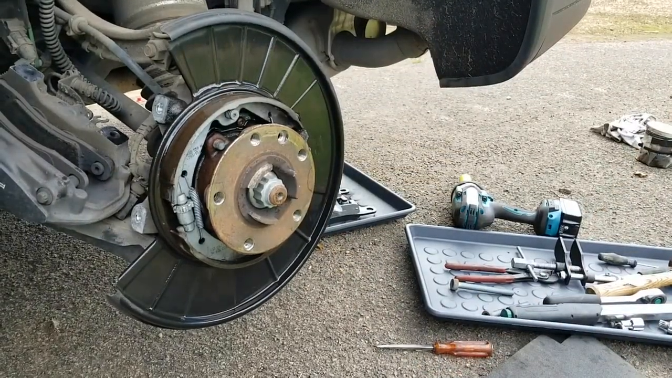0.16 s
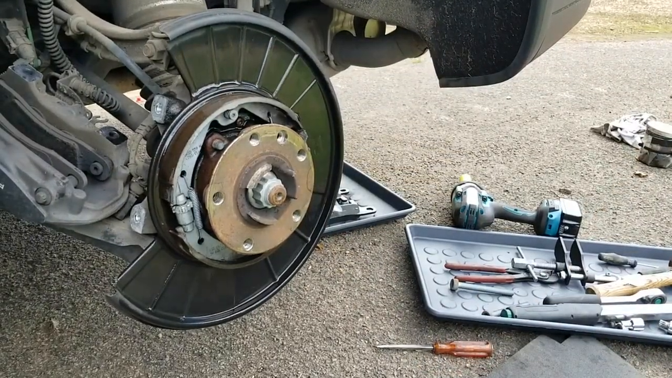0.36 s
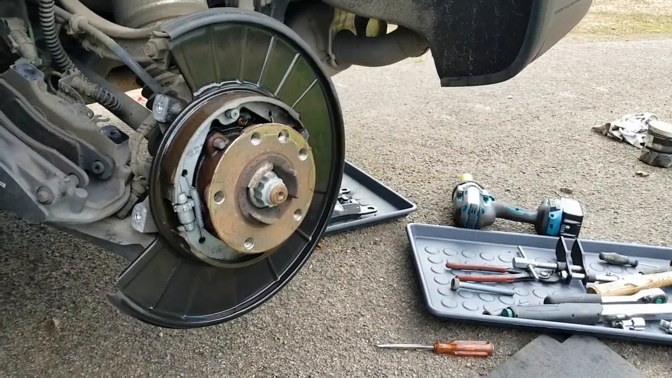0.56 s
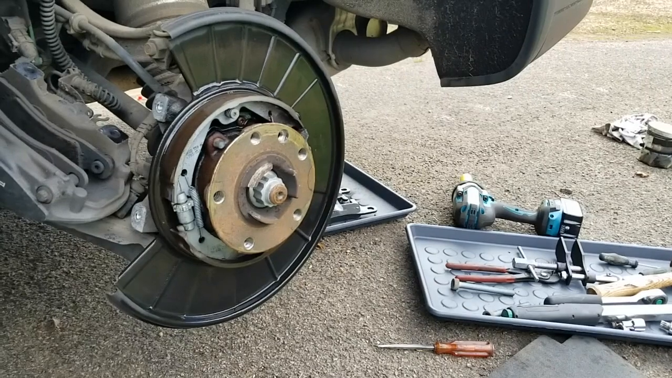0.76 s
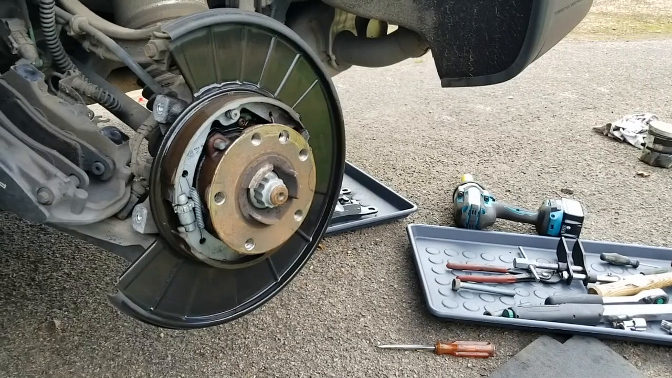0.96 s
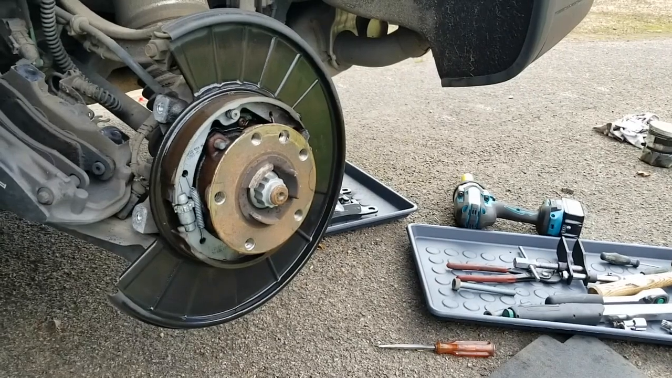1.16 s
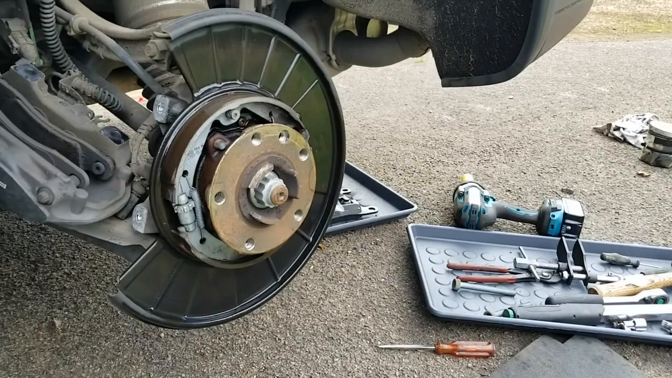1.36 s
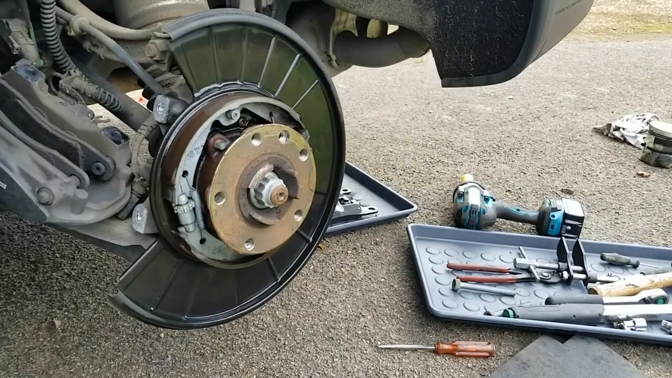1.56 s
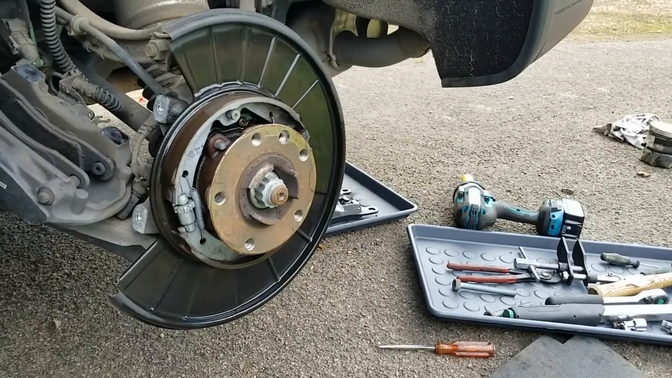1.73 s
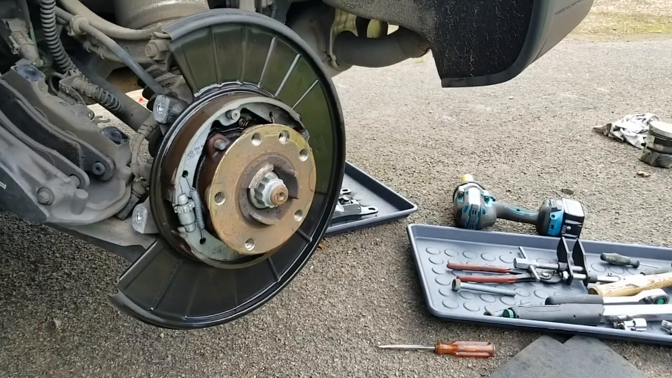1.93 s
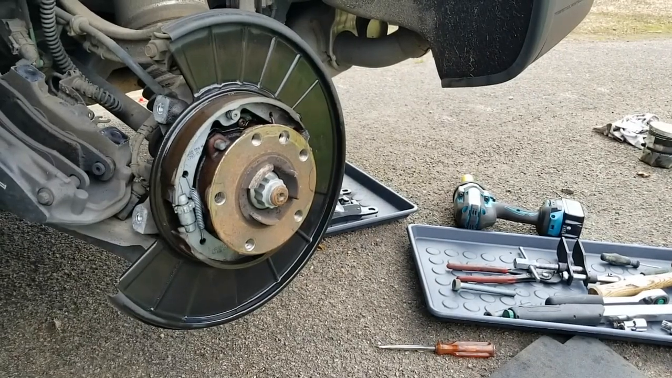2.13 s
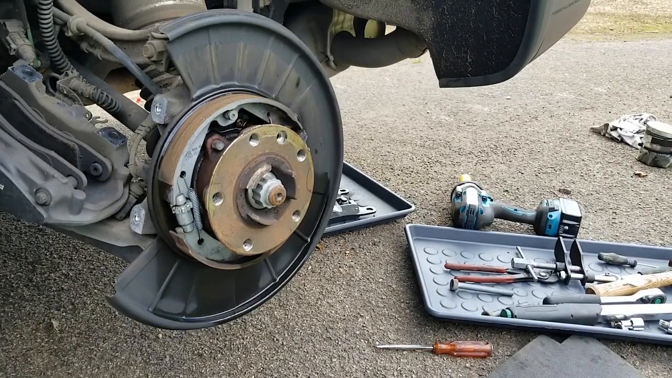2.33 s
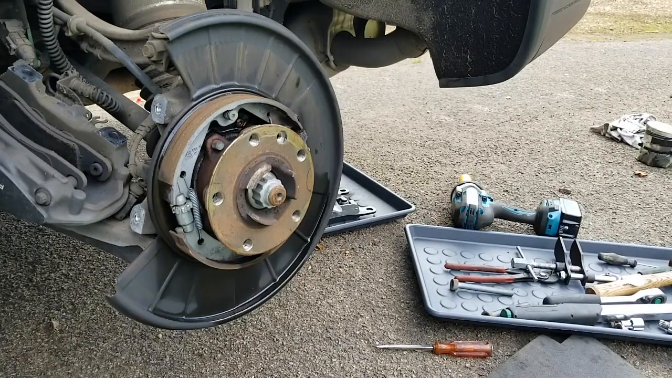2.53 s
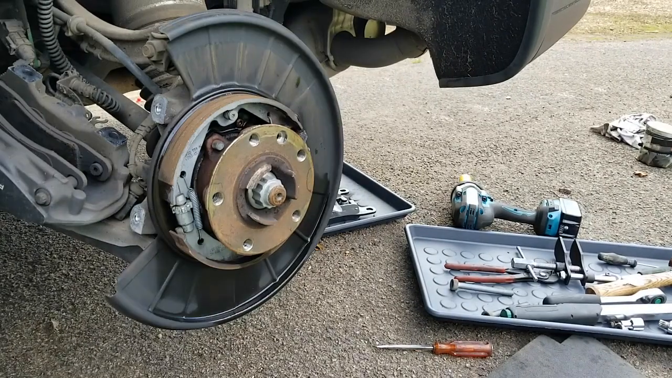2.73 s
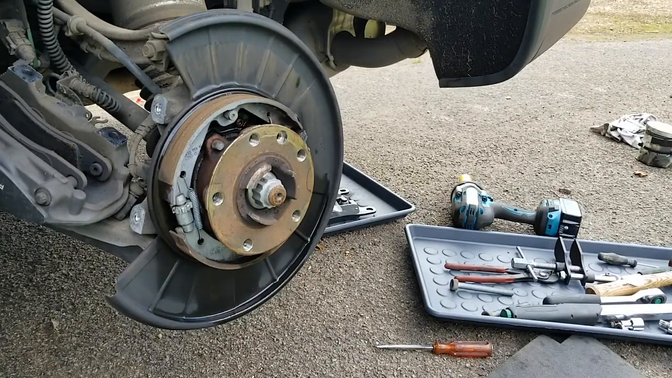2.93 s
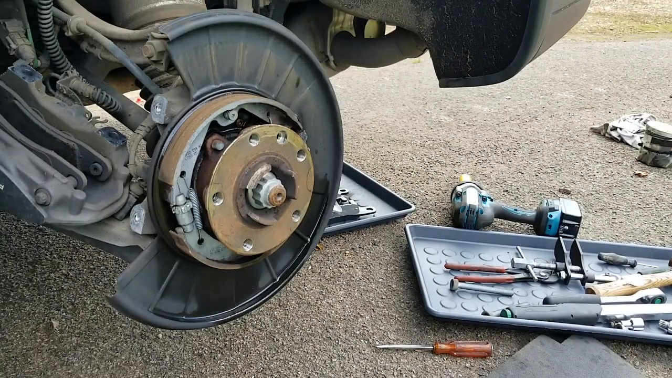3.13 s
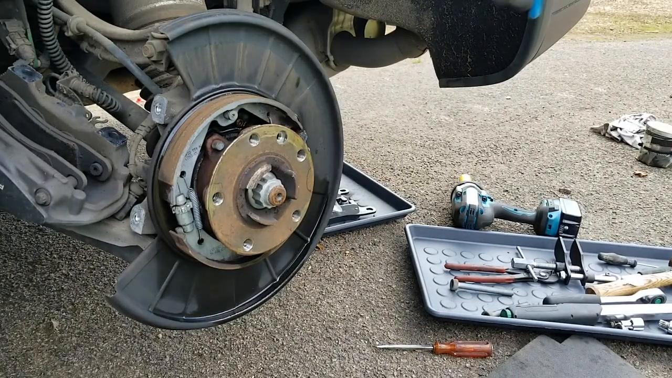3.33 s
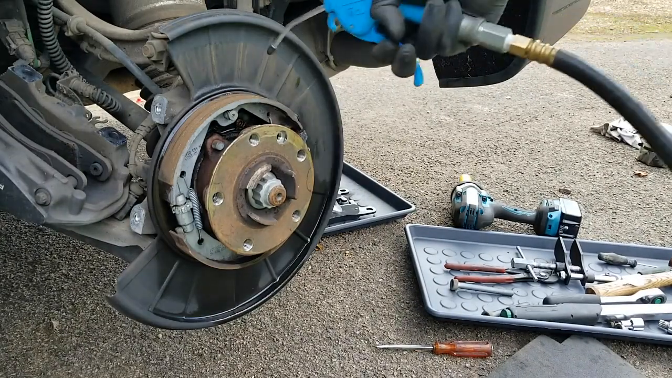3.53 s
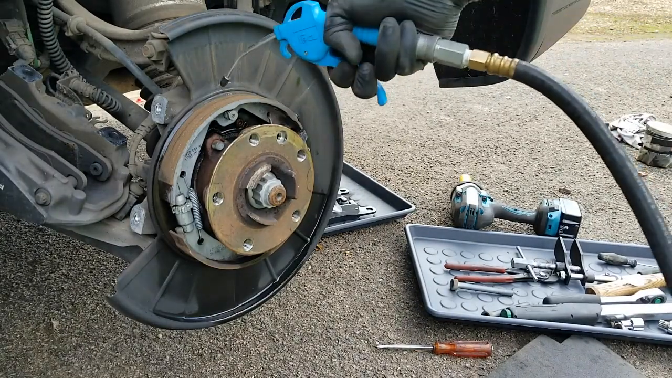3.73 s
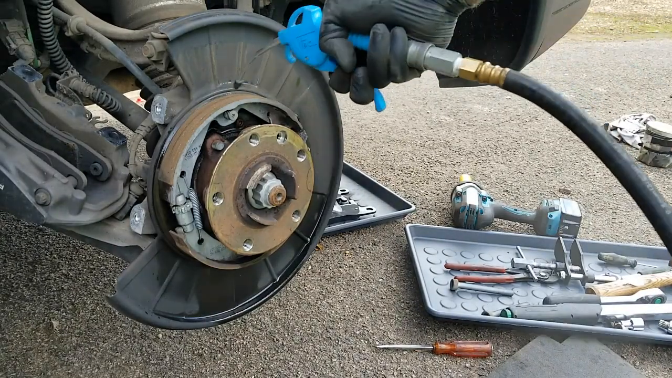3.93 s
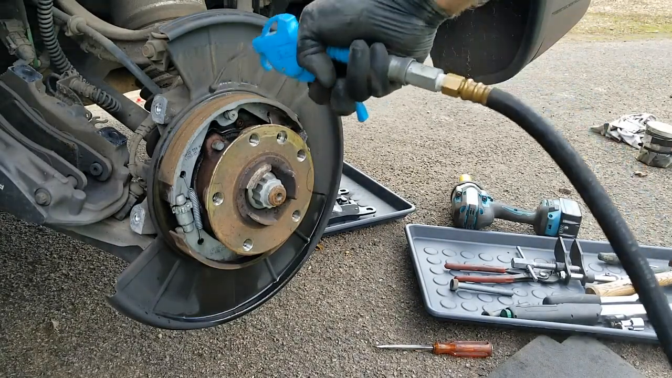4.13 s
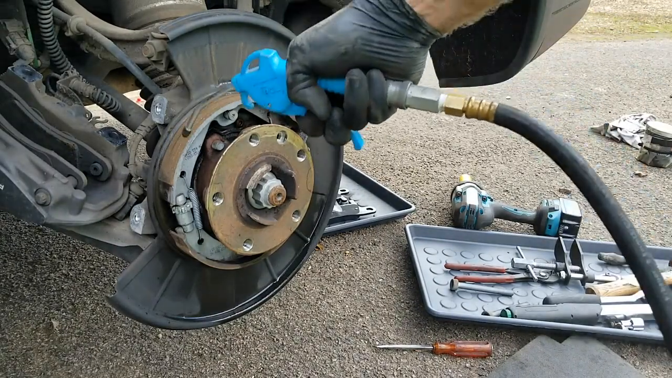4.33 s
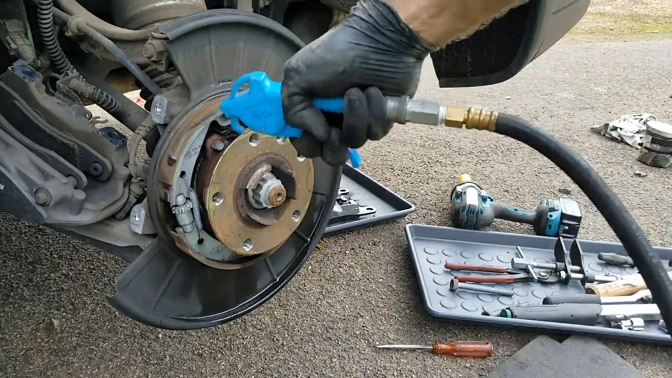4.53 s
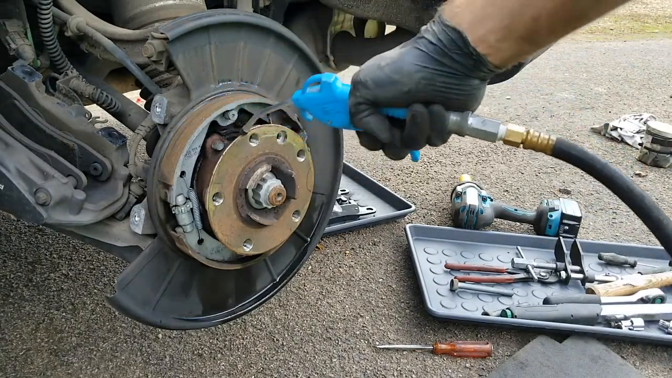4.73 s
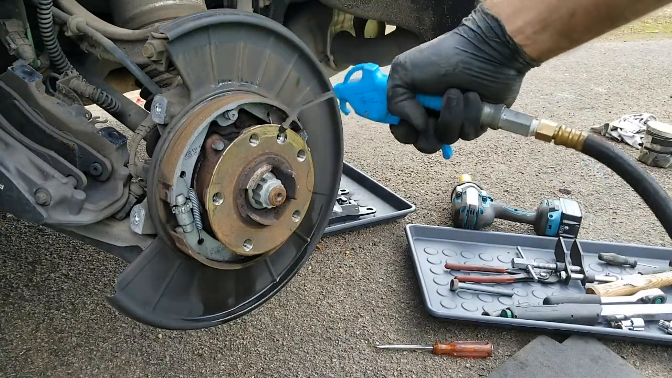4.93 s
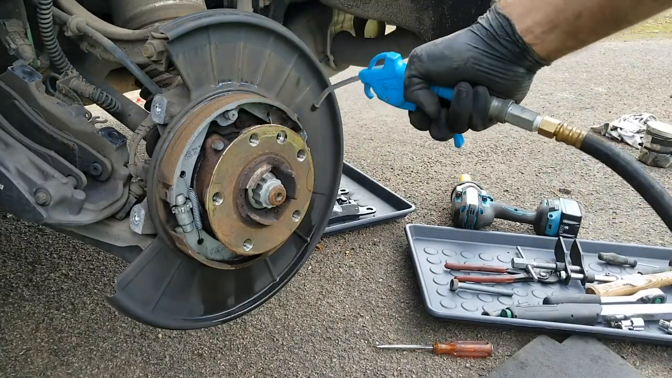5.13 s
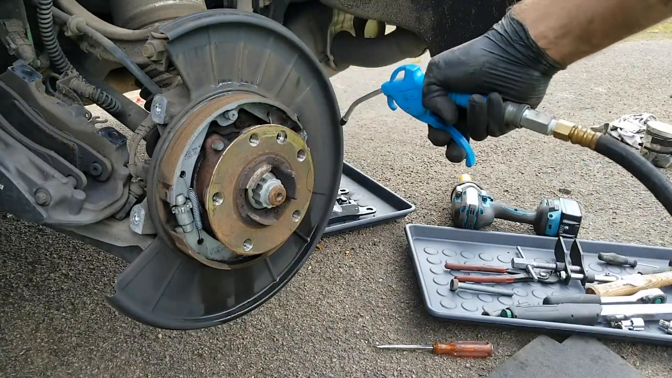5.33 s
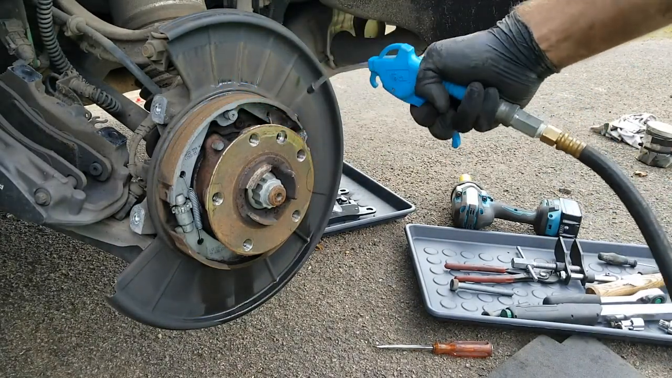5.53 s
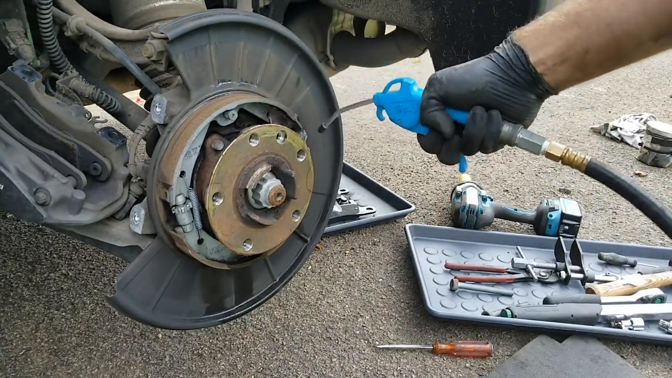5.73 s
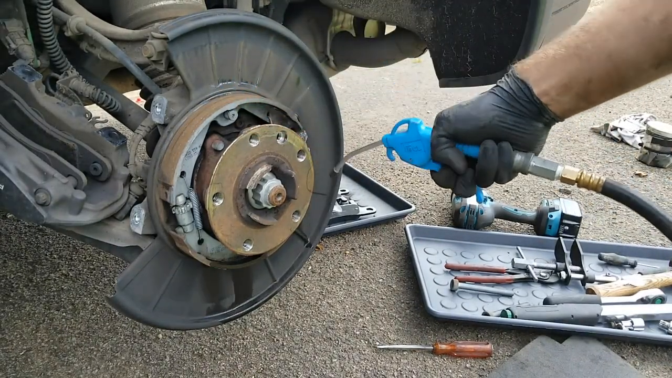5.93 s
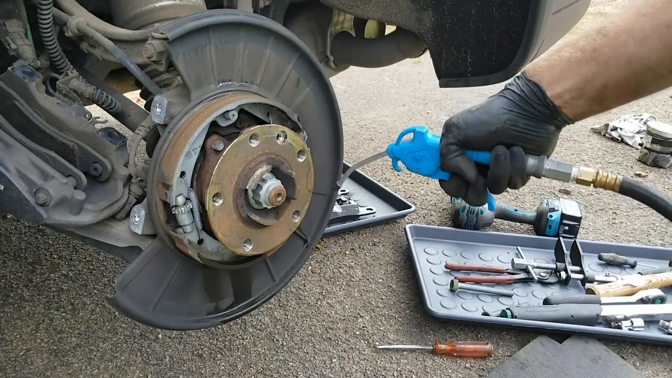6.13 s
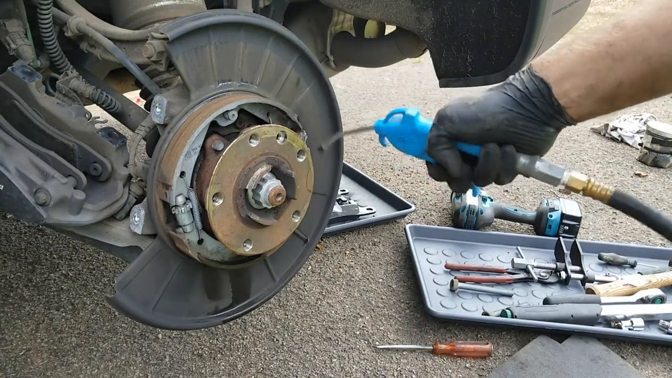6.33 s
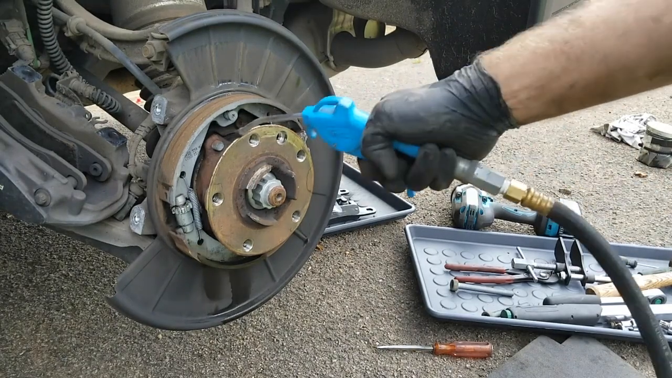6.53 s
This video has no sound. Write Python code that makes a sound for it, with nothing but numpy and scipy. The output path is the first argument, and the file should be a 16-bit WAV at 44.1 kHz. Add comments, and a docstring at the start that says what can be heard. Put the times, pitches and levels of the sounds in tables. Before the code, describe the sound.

Very quiet outdoor air with soft rustles and tiny knocks, then a faint thin squeak and a low motor hum that swells. A few sharper clicks lead into a sudden loud air-gun blast lasting over a second, hissing and roaring on metal. Two half-second blasts follow, then three rapid jabs, each cutting off sharply. Close stereo microphone, leaning right, with a slight short echo.

```python
"""On the drive outside a garage, a blow gun blasts air over a car's rear drum brake.
At first there is only quiet outdoor air with rustling, small knocks and a faint squeak; then a motor hums
and the gun is fired six times. Air, rustles, puffs and jet are shaped noise; the motor is a stack of sine
tones over noise. The jet hisses, roars and rushes on the metal, howls in hollows and rings the plate."""
import sys
import numpy as np
from scipy import signal
from scipy.fft import rfft, irfft
from scipy.io import wavfile
from scipy.ndimage import uniform_filter1d, map_coordinates

SR = 44100
rng = np.random.default_rng(int(sys.argv[2]) if len(sys.argv) > 2 else 0)


def unload_audio(sound):
    """Save the sound as a 16-bit wav file, at the path given as the first command line argument."""
    columns = np.transpose(np.atleast_2d(sound))
    # keep every value between -1 and 1, then stretch to whole-number steps
    steps = np.round(np.clip(columns, -1, 1) * 32767)
    wavfile.write(sys.argv[1], SR, steps.astype(np.int16))


N = 294588
TIME = np.arange(N) / SR
BIN_HZ = np.arange(N // 2 + 1) * SR / N

# Spectrum tables give only the shape of a noise; noise() evens out the overall strength.
# Levels in all tables come before trims, wavering and panning.

# quiet outdoor air, spectrum: (f/Hz, level/dB)
AIR_SPECTRUM = [(15, -42), (25, -27), (43, 0), (106, 0), (186, -14.5), (271, -14), (394, -5.5), (515, -6.5),
                (1060, -11.5), (1910, -31.5), (3090, -26), (4380, -34.5), (5570, -35), (7890, -41),
                (15000, -34)]
AIR_DB = -59.5
# rustling strokes nearby: (middle t/s, half length t/s, scuff level/dB, fine hiss level/dB)
RUSTLES = [(0.166, .13, -59, -63), (0.407, .035, -62, -68), (0.548, 0.048, -64.5, -64.5),
           (0.7, 0.074, -66, -64.5), (1.146, 0.14, -64, -64), (1.388, 0.071, -66, -61.5),
           (2.654, 0.084, -53, -66), (2.85, 0.095, -60.5, -59), (3.08, .07, -62, -74),
           (3.301, 0.057, -58, -55.5), (3.41, 0.067, -52, -57.5)]
# scuffing sound of a rustle, spectrum: (f/Hz, level/dB)
SCUFF_SPECTRUM = [(500, 10), (1000, 8.5), (1600, 2.5), (2300, -3), (3200, 0), (4200, -15), (7000, -30),
                  (10000, -68)]
# fine hiss of the rustles and the motor, spectrum: (f/Hz, level/dB)
FINE_HISS_SPECTRUM = [(2000, -26), (4000, -2.5), (6500, -5), (9000, -10.5), (12500, 1.5), (15700, -2)]
# small knocks and scrapes of handling: (t/s, level/dB, decay t/s, ringing f/Hz)
KNOCKS = [(1.07, -53.5, 0.017, 900), (1.172, -54.5, .0055, 2110), (1.239, -59, .0062, 2000),
          (1.302, -56.5, .026, 1000), (1.322, -53, 0.048, 1000), (2.795, -44, 0.01, 1100),
          (2.915, -36.5, 0.0039, 1380), (3.385, -41, 0.0076, 696), (3.405, -38, .006, 900),
          (3.418, -31, 0.0035, 1500)]
# dull thud of a knock, spectrum: (f/Hz, level/dB)
THUD_SPECTRUM = [(150, -8), (600, 8.5), (950, 6.5), (1500, -3.5), (2500, -4.5), (4500, -23), (14000, -42)]
KNOCK_ATTACK_S, KNOCK_WIDTH_HZ = .002, 700
KNOCK_RING_DB, KNOCK_THUD_DB = -1.5, -1.5
# a faint high squeak: (t/s, f/Hz, level/dB)
SQUEAK = [(2.11, 5900, -95), (2.17, 5750, -77), (2.28, 5530, -79), (2.34, 5500, -86)]
# motor speed: (t/s, turns per second f/Hz)
MOTOR_SPEED = [(2.38, 39), (2.70, 37.7), (2.88, 33.3), (2.99, 40), (3.30, 39.3), (3.5, 36.6), (6.68, 38)]
# motor tones at one, two and three times the speed: (level/dB), relative to the motor
MOTOR_ORDERS_DB = [-4.5, -3, -8]
# rumble of the motor, spectrum: (f/Hz, level/dB)
RUMBLE_SPECTRUM = [(25, -7), (70, -2), (150, -0.5), (260, -5), (500, -14), (900, -10), (1500, -16),
                   (3000, -24.5), (4200, -50)]
MOTOR_DB, MOTOR_SWELL_DB_PER_S = -46, 4.5
TURNED_DOWN_DB, TURN_DOWN_S = -62.5, 0.061
# and turned up a little towards the end
TURN_UP_FROM_S, TURN_UP_DB = 5.6, 5
DRONE_FROM_S, DRONE_RISE_S = 2.9, 0.061
DRONE_WEAK_DB, DRONE_STRONG_DB = -9, 0  # relative to the motor
# stray puffs of air on the microphone: (t/s, level/dB, half length t/s)
PUFFS = [(0.027, -56.5, 0.035), (1.081, -49.5, .012), (2.788, -36, 0.0098), (3.732, -45, 0.014),
         (4.027, -38, 0.0098), (4.752, -43.5, 0.0092), (4.956, -43.5, 0.011), (5.132, -45, 0.0081),
         (5.412, -39.5, 0.016), (6.491, -37, 0.012)]
LULL_FROM_S, LULL_TO_S = 2.342, 2.381  # the background nearly falls silent for a moment

# blasts of the gun: (trigger opens t/s, closes t/s, starting hiss level/dB, hiss sag in dB per s,
# roar level/dB and rush level/dB relative to the impact)
BLASTS = [(3.450, 4.574, -14.5, 3.5, -6.5, -2), (4.689, 5.211, -16, 1.75, -5, 0),
          (5.391, 5.978, -19, 4.2, -4, -1.8), (6.046, 6.155, -20, 23, -6, -3.5),
          (6.25, 6.352, -16, 22, -3.5, -4), (6.46, 6.772, -14.5, 22, -7, -3.5)]
# how hard the jet strikes as the nozzle is swept round the hub, a list per blast: (t/s, impact level/dB)
SWEEPS = [
    [(3.465, -22.5), (3.495, -20), (3.673, -29.5), (3.703, -24.5), (3.723, -32), (3.909, -27.5),
     (3.925, -32), (3.999, -27.5), (4.039, -29), (4.285, -32.5), (4.329, -26.5), (4.57, -27)],
    [(4.7, -32.5), (4.75, -30.5), (4.786, -25), (4.802, -29), (4.874, -24.5), (4.924, -32.5), (4.978, -24),
     (4.992, -30), (5.052, -25), (5.064, -29), (5.148, -23), (5.21, -28)],
    [(5.4, -23.5), (5.444, -24.5), (5.468, -17), (5.522, -23.5), (5.554, -19.5), (5.604, -29), (5.644, -17),
     (5.744, -23), (5.804, -30.5), (5.86, -19), (5.9, -27), (5.975, -26)],
]
# the same while the nozzle is jabbed at the brake: (t/s, impact level/dB)
JABS = [
    [(6.055, -22), (6.083, -16.5), (6.143, -22), (6.155, -27)],
    [(6.26, -22), (6.288, -15), (6.342, -27.5), (6.352, -24.5)],
    [(6.47, -20), (6.486, -30), (6.562, -22.5), (6.675, -19)],
]
# brief dips of the hiss: (t/s, half length t/s, depth level/dB)
HISS_DIPS = [(3.965, 0.022, 4), (4.183, 0.039, 3.5), (4.376, .04, 0.5), (4.572, 0.058, 7.5),
             (4.703, .04, 7.5), (4.915, 0.031, 4), (5.075, 0.021, 7.5), (5.171, 0.035, 6.5),
             (5.77, .04, 5.5)]
HISS_WANDER_DB, HISS_WANDER_HZ = 0.78, 8
ROAR_GROWTH, FULL_IMPACT_DB = 0.92, -23  # dB of roar per dB of impact, about this level
COLOUR_WANDER_DB, COLOUR_WANDER_HZ = 0.55, 10.6  # as the angle changes, rush and roar trade places
# hiss of the free jet, spectrum: (f/Hz, level/dB)
HISS_SPECTRUM = [(2000, -88), (6000, -11), (8500, -12.5), (10000, -7.5), (11500, -0.5), (13000, 1),
                 (15700, 1.5)]
# roar where the jet strikes the metal, spectrum: (f/Hz, level/dB)
ROAR_SPECTRUM = [(60, -24), (200, -21), (430, -16.5), (750, -8.5), (1050, -5.5), (1400, 0.5), (1700, -1.5),
                 (2200, 1), (3050, 2), (3700, -8), (6000, -17), (12000, -35)]
# brighter rush of the striking jet, spectrum: (f/Hz, level/dB)
RUSH_SPECTRUM = [(900, -20.5), (2300, -4), (3000, 3.5), (3800, 0.5), (5000, 3), (6500, -0.5), (7600, -3),
                 (8700, -19.5), (13000, -12.5)]
# low turbulence of the spreading jet, spectrum: (f/Hz, level/dB)
BODY_SPECTRUM = [(100, -10.5), (300, -0.5), (450, -2.5), (800, -6.5), (1600, -17)]
BODY_DB = -48.5
BODY_FOLLOWS = 0.32  # share of the roar's swing that the low turbulence follows
# hollows of the brake that the jet blows across: (from t/s, to t/s, f/Hz, width f/Hz, level/dB)
HOLLOWS = [(3.407, 3.57, 1358, 130, -28.5), (5.434, 5.59, 2300, 266, -31), (5.601, 5.738, 1660, 200, -39),
           (6.023, 6.128, 2100, 450, -23), (6.228, 6.322, 1407, 380, -25), (6.51, 6.65, 2815, 222, -17),
           (6.61, 6.722, 2269, 259, -27.5)]
# ringing of the backing plate and hub: (f/Hz, level/dB, time to fall by 60 dB t/s)
PLATE = [(1510, -6, 1), (2230, -11, 0.12), (2977, -6, 0.11), (3960, 0, 0.09), (5330, -2, 0.093)]

PORT_GAP_S = 0.00055  # time that sound takes from one microphone port to the other
TAIL_T60_S, TAIL_DB = 0.37, -21.5  # echo: time to fall by 60 dB, and strength
CUTOFF_HZ = 15800


def from_db(db):
    """Turn decibels into a plain gain."""
    return 10 ** (np.asarray(db) / 20)


def rms_one(x):
    """Scale to an average strength (rms) of 1."""
    return x / np.sqrt(np.mean(x ** 2) + 1e-20)


def in_time(rows):
    """Columns of a curve table, sample by sample."""
    s, *columns = np.transpose(rows)
    return [np.interp(TIME, s, c) for c in columns]


def ramp(start, length):
    """Rise from 0 to 1 in a straight line."""
    return np.clip((TIME - start) / length, 0, 1)


def drift(rate):
    """Chance wavering with a spread of 1; a higher rate in Hz wavers faster."""
    return rms_one(irfft(rfft(rng.standard_normal(N)) / (1 + (BIN_HZ / rate) ** 2) ** 2, N))


def noise(spectrum, share=1):
    """Turbulence with a given spectrum; rms 1, of which a share of the power may be taken at each frequency."""
    hz, db = np.transpose(spectrum)
    log_hz = np.log(BIN_HZ + 1)
    # the bass falls away below the first table row
    below = np.maximum(np.log(hz[0]) - log_hz, 0)
    gain = from_db(np.interp(log_hz, np.log(hz), db) - 20 * below)
    return irfft(rfft(rng.standard_normal(N)) * rms_one(gain) * np.sqrt(share), N)


def wide_noise(spectrum, bass_likeness):
    """Noise from all around: alike at the two ports only where the waves are longer than their gap."""
    alike = np.clip(bass_likeness, 0, .99) * np.sinc(2 * BIN_HZ * PORT_GAP_S)
    shared = noise(spectrum)
    opposed = noise(spectrum, (1 - alike) / (1 + alike))
    return shared + opposed * np.array([[1], [-1]])


def resonate(x, hz, width_hz):
    """One resonance, gain 1 on top."""
    r = np.exp(-np.pi * width_hz / SR)
    feed = np.array([1, 0, -1]) * (1 - r * r) / 2
    return signal.lfilter(feed, [1, -2 * r * np.cos(2 * np.pi * hz / SR), r * r], x)


def pan(x, left_db):
    """Make the left louder than the right by left_db; a negative value favours the right."""
    return x * from_db(np.array([[left_db], [-left_db]]) / 2)


def delayed(x, seconds):
    """The same sound later, by a fixed or changing time."""
    return map_coordinates(x, [(TIME - seconds) * SR], order=2)


def outdoors():
    """Quiet outdoor air: steady noise from all around."""
    return from_db(AIR_DB) * wide_noise(AIR_SPECTRUM, bass_likeness=0.77)


def rustling():
    """Each stroke swells and fades smoothly, a scuff with a fine hiss on top."""
    scuff, fine = 0, 0
    for middle, length, scuff_db, fine_db in RUSTLES:
        stroke = 1 / np.sqrt(1 + ((TIME - middle) / length) ** 4)
        scuff = np.maximum(scuff, from_db(scuff_db) * stroke)
        fine = np.maximum(fine, from_db(fine_db) * stroke)
    grain = from_db(1.4 * drift(80))  # rubbing surfaces catch and slip
    scuff_sound = scuff * wide_noise(SCUFF_SPECTRUM, bass_likeness=0.98)
    fine_sound = fine * wide_noise(FINE_HISS_SPECTRUM, bass_likeness=.5)
    return grain * (scuff_sound + fine_sound)


def knocks():
    """Tools and hose are moved: each knock is a dull thud with a brief ring of its own pitch."""
    thud = wide_noise(THUD_SPECTRUM, bass_likeness=.8)
    white = rng.standard_normal(N)
    out = 0
    for s, db, decay, hz in KNOCKS:
        attack = ramp(s - KNOCK_ATTACK_S / 2, KNOCK_ATTACK_S)
        blow = from_db(db) * attack * np.exp(-np.abs(TIME - s) / decay)
        ring = rms_one(resonate(resonate(white, hz, KNOCK_WIDTH_HZ), hz, KNOCK_WIDTH_HZ))
        out = out + blow * (from_db(KNOCK_THUD_DB) * thud + from_db(KNOCK_RING_DB) * ring)
    return out


def squeak():
    """A thin, unsteady tone that sinks a little."""
    hz, db = in_time(SQUEAK)
    sounding = (TIME > SQUEAK[0][0]) & (TIME < SQUEAK[-1][0])
    angle = 2 * np.pi * np.cumsum(hz * (1 + .035 * drift(400))) / SR
    return sounding * from_db(db) * np.sin(angle)


def motor():
    """A running motor: tones at multiples of its speed over rumble and faint hiss, turned down under the blasts."""
    speed, = in_time(MOTOR_SPEED)
    turned_down = ramp(BLASTS[0][0], TURN_DOWN_S)
    swelling_db = MOTOR_DB + MOTOR_SWELL_DB_PER_S * (TIME - LULL_TO_S)
    level_db = (1 - turned_down) * swelling_db + turned_down * TURNED_DOWN_DB
    level_db = level_db + TURN_UP_DB * ramp(TURN_UP_FROM_S, .5)
    # the fifth multiple drones, stronger between its rise and the blasts
    drone_on = ramp(DRONE_FROM_S, DRONE_RISE_S) * (1 - turned_down)
    drone_db = DRONE_WEAK_DB + (DRONE_STRONG_DB - DRONE_WEAK_DB) * drone_on
    angle = 2 * np.pi * np.cumsum(speed * (1 + 0.0076 * drift(12))) / SR
    tones = from_db(drone_db) * np.sin(5 * angle)
    for multiple, db in enumerate(MOTOR_ORDERS_DB, start=1):
        phase = 2 * np.pi * rng.random()
        tones = tones + from_db(db + 1.3 * drift(10)) * np.sin(multiple * angle + phase)
    rumble = from_db(-2.5) * pan(wide_noise(RUMBLE_SPECTRUM, bass_likeness=.75), -2.4)
    hiss = from_db(-22) * wide_noise(FINE_HISS_SPECTRUM, bass_likeness=.5)
    running = TIME > LULL_TO_S
    return running * from_db(level_db) * (np.sqrt(2) * tones + rumble + hiss)


def puffs():
    """Stray air buffets the ports with short low thumps."""
    strength = sum(from_db(db) * np.exp(-((TIME - s) / length) ** 2) for s, db, length in PUFFS)
    spectrum = [(40, 4), (80, 1.5), (190, 1.0), (400, -7), (1200, -42), (5000, -69)]  # (f/Hz, level/dB)
    return strength * wide_noise(spectrum, bass_likeness=0.35)


def wheel_arch(x, lag_s, bounce_db, sway, count=5):
    """Direct path, later at the right port, and short bounces off brake, body and ground that shift with the hand."""
    ports = np.array([x, delayed(x, lag_s)])
    for port in ports:
        for path_s in rng.uniform(.0006, .005, count):
            bounce = from_db(bounce_db) * rng.choice([-1, 1])
            port += bounce * delayed(x, path_s * (1 + sway * drift(2.542)))
    # the bounces change the colour, not the strength
    return ports / np.sqrt(uniform_filter1d(ports.mean(axis=0) ** 2, size=4000))


def garage(x, size=SR // 2):
    """Diffuse echo of the car and the garage front, different at each port."""
    t = np.arange(size) / SR
    fading = from_db(-60 * t / TAIL_T60_S) * (1 - np.exp(-t / 0.015))
    tails = rng.standard_normal((2, size)) * fading
    tails /= np.sqrt(np.sum(tails ** 2, axis=1, keepdims=True))
    return from_db(TAIL_DB) * signal.fftconvolve(x, tails, axes=1)[:, :N]


def valve(rise_s, fall_s):
    """Air flow: swells as the trigger is squeezed, dies as the lance empties."""
    flow = 0
    for opens, closes, *_ in BLASTS:
        squeeze = np.clip((TIME - opens) / rise_s + .5, 0, 1) ** 2
        flow = flow + squeeze * np.exp(-np.maximum(TIME - closes, 0) / fall_s)
    return flow


def jet_levels():
    """Hiss, roar and rush in dB: the hiss sags while the trigger is held; roar and rush follow the impact."""
    rows = []
    for opens, closes, hiss, sag, roar, rush in BLASTS:
        rows.append((opens, hiss, roar, rush))
        rows.append((closes, hiss - sag * (closes - opens), roar, rush))
    hiss_db, roar_db, rush_db = in_time(rows)
    dips_db = sum(depth * np.exp(-((TIME - s) / length) ** 2) for s, length, depth in HISS_DIPS)
    impact_db, = in_time(np.vstack([*SWEEPS, *JABS]))
    colour_db = COLOUR_WANDER_DB * drift(COLOUR_WANDER_HZ)
    return (hiss_db - dips_db + HISS_WANDER_DB * drift(HISS_WANDER_HZ),
            roar_db + FULL_IMPACT_DB + ROAR_GROWTH * (impact_db - FULL_IMPACT_DB) - colour_db,
            rush_db + impact_db + colour_db)


def hollows():
    """Each hollow howls while the jet sweeps across its mouth."""
    out = np.zeros(N)
    for start, end, hz, width_hz, db in HOLLOWS:
        sweep = np.sin(np.pi * ramp(start, end - start))
        # two passes through the same resonance sharpen the howl
        howl = resonate(resonate(rng.standard_normal(N), hz, width_hz), hz, width_hz)
        out += from_db(db) * sweep * rms_one(howl)
    return np.array([out, delayed(out, 0.000096)])


def blow_gun():
    """The free jet hisses; on the metal it flutters, roars and sets the plate ringing."""
    hiss_db, roar_db, rush_db = jet_levels()
    flutter = drift(23)
    hiss = wheel_arch(noise(HISS_SPECTRUM), lag_s=0.000121, bounce_db=0, sway=.14)
    hiss = hiss * from_db(hiss_db + 1.67 + 0.41 * flutter)
    roar = wheel_arch(noise(ROAR_SPECTRUM), lag_s=0.0001, bounce_db=-9.5, sway=0.122)
    roar = roar * from_db(roar_db + 0.51 + 2.1 * flutter)
    rush = wheel_arch(noise(RUSH_SPECTRUM), lag_s=0.00011, bounce_db=-1, sway=0.0892)
    rush = rush * from_db(rush_db - 0.1 + 1.0 * flutter)
    roar_swing_db = roar_db - roar_db[TIME > BLASTS[0][0]].mean()
    body = from_db(BODY_DB + BODY_FOLLOWS * roar_swing_db) * wide_noise(BODY_SPECTRUM, bass_likeness=0.75)
    placed = pan(hiss, -1.8) + pan(roar + body + hollows(), -4.0) + pan(rush, -0.25)
    jet = valve(rise_s=0.018, fall_s=0.007) * placed
    ringing = 0
    for hz, db, t60 in PLATE:
        width_hz = np.log(1000) / (np.pi * t60)  # the longer it rings, the narrower it is
        ringing = ringing + from_db(db) * resonate(jet, hz, width_hz)
    return jet + ringing + garage(jet)


def scene():
    """Outdoor air, handling, motor and puffs lie under the blasts; every layer leans to the right channel."""
    in_lull = 1.0 * ((TIME > LULL_FROM_S) & (TIME < LULL_TO_S))
    lull = 1 - 0.94 * uniform_filter1d(in_lull, size=200)
    handling = rustling() + knocks() + squeak()
    background = pan(outdoors(), -2.2) + pan(handling, -7.0) + pan(motor() + puffs(), -4.5)
    return lull * background + blow_gun()


def record(dry):
    """The highest peaks are held at full scale and the top is cut."""
    top_cut = signal.ellip(12, .1, 75, CUTOFF_HZ, fs=SR, output="sos")
    return signal.sosfilt(top_cut, np.clip(dry, -1, 1))


dry = scene()
out = record(dry)
unload_audio(out)
```